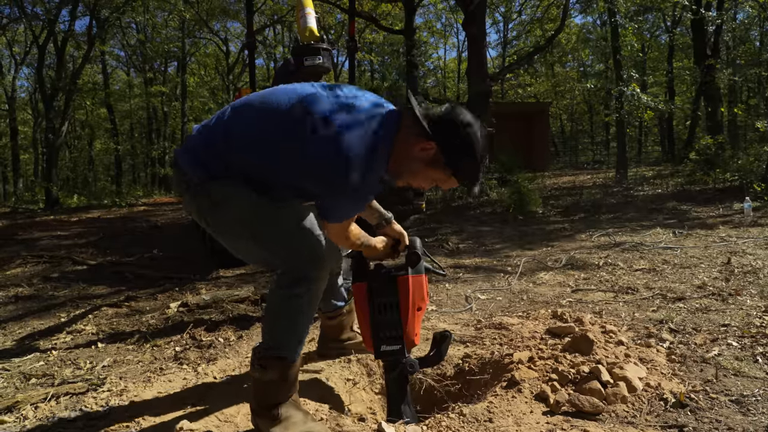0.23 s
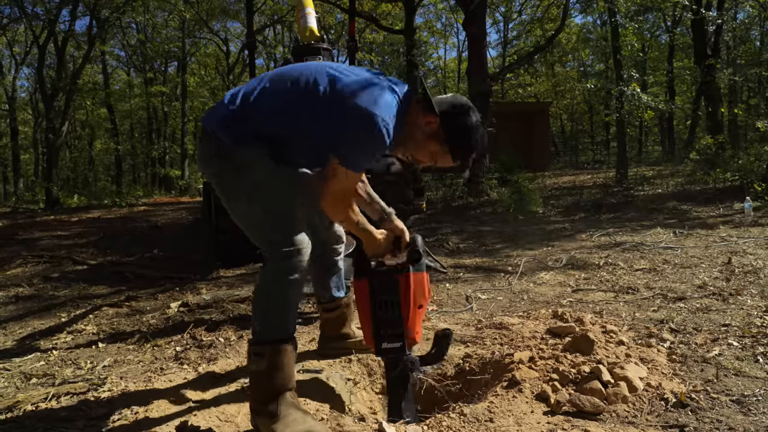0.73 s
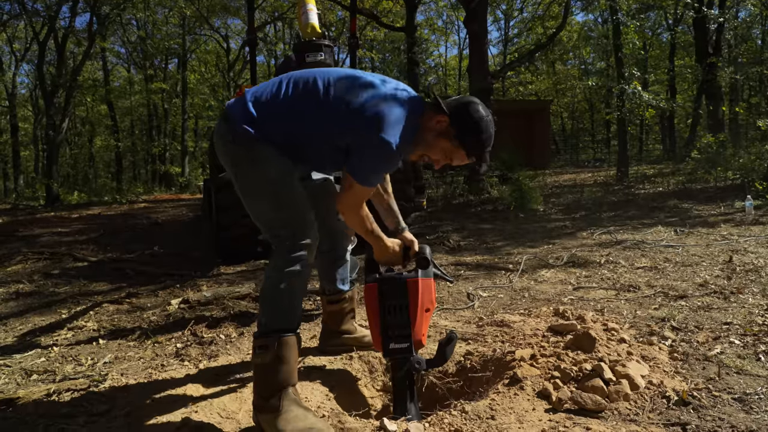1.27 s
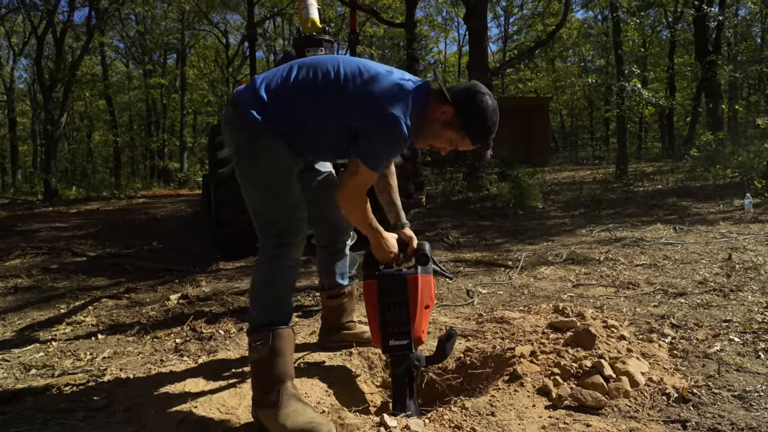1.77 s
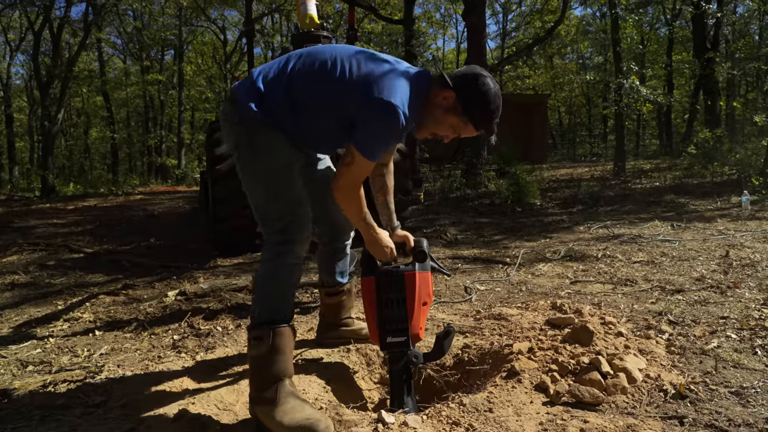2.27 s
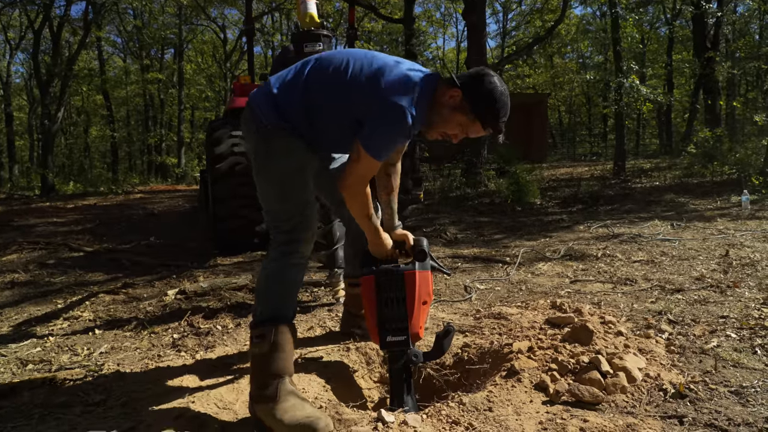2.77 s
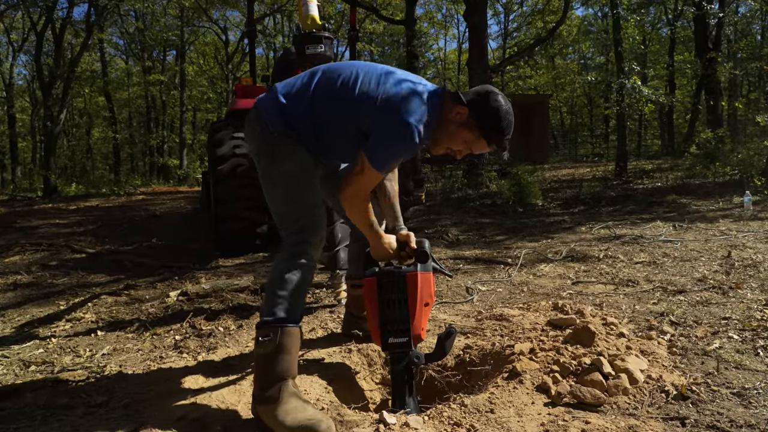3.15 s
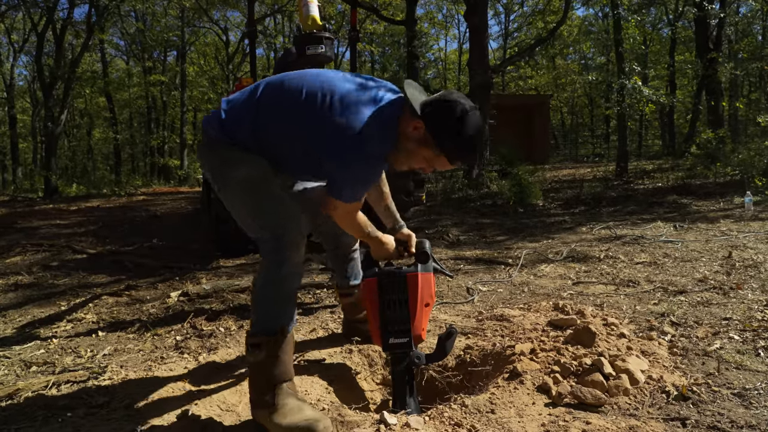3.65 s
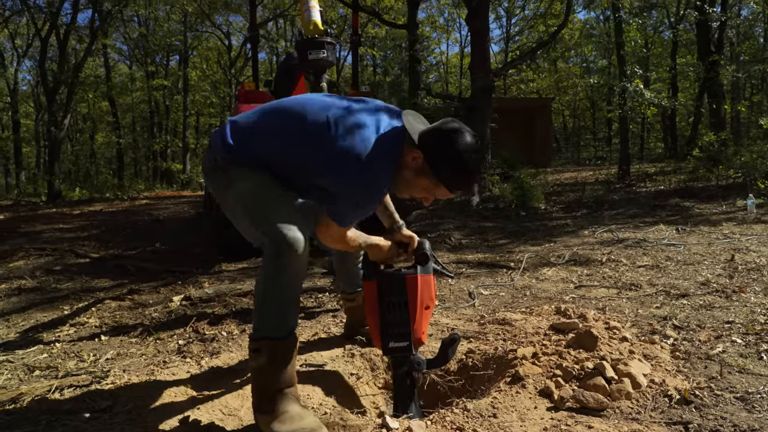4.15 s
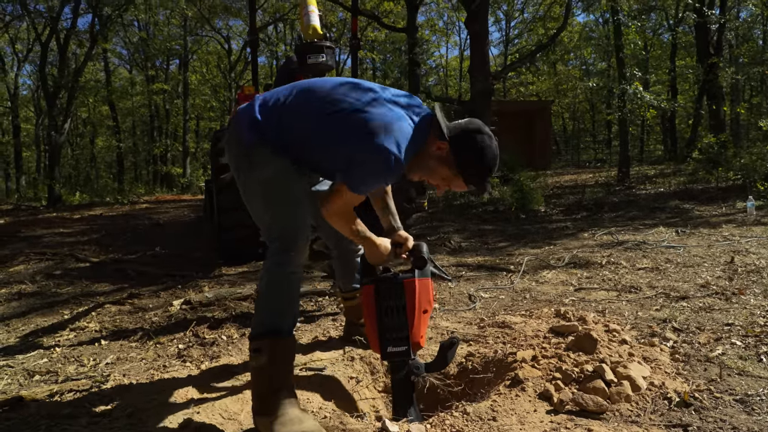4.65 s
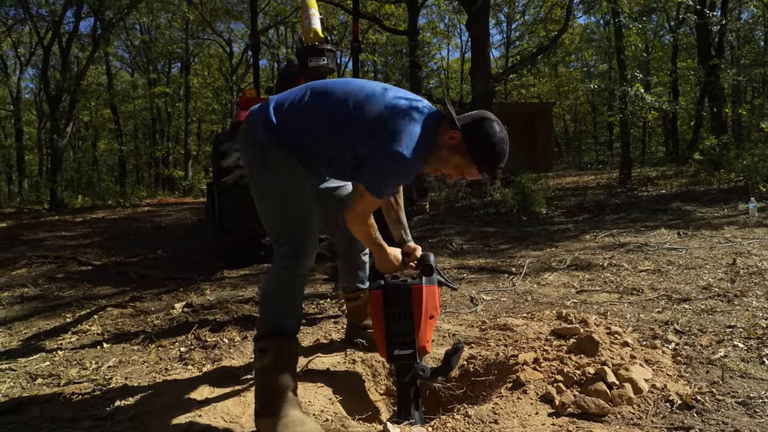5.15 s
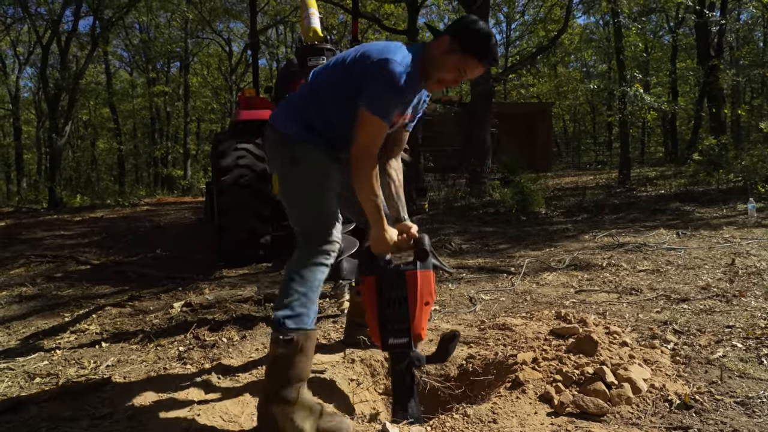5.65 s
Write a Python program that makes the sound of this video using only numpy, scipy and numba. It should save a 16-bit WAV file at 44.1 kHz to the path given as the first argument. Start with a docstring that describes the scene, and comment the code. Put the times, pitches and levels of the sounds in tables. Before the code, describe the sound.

Outdoors, close to a demolition hammer working rock in a hole, with a tractor's low diesel idle behind. From 0 to 0.4 s the pressed tip grinds roughly, with pulsing grit, slips and small rattles. Between 0.43 and 1.05 s hard, bright steel clanks come fast and uneven, with brief squeals and high chisel chatter. From 1.2 to 2.5 s blows are more spaced, roughly seven to ten a second, ringing thinly above lighter grinding. From 2.5 to 3.65 s they grow sparser and softer. A short hard burst at 3.76-3.97 s leads into heavy, gritty grinding with small squeals until 4.48 s. Strong clanks then return in clusters until about 5.3 s. After a gap, weaker knocks and one sharp, squealing hit fall at 5.64-5.77 s. At 5.83 s a dull low rumble starts abruptly and holds to the end. Very dry, faint woodland scatter; the hardest blows clip.

```python
"""Outdoors, in a post hole, a demolition hammer is worked into rock while a tractor idles behind it.
Its crank runs throughout; uneven blows are bursts of filtered noise and damped tones, and sine modes ring the chisel.
Leaned on, the tip grinds as noise through stone and contact resonances, slips, rattles and squeals.
Firing pulses and noise make the tractor; a low rumble sets in near the end. The loudest blows overload the microphone."""
import sys
import numpy as np
from scipy import signal
from scipy.fft import rfft, irfft, next_fast_len
from scipy.io import wavfile
from scipy.ndimage import uniform_filter1d
from numba import njit

SR = 44100
rng = np.random.default_rng(int(sys.argv[2]) if len(sys.argv) > 2 else 0)


def to_wav(sig):
    """Store sig (one row per channel, or 1-D mono) as 16-bit WAV at the path in sys.argv[1].

    Samples outside -1..1 are clipped; the rate is SR.
    """
    pcm = np.clip(np.atleast_2d(sig), -1, 1) * 32767
    pcm = np.round(pcm).astype(np.int16)
    wavfile.write(sys.argv[1], SR, pcm.T)  # frames by channels


N = 260631  # length in samples


def undb(db):
    """Decibels to gain."""
    return 10 ** (np.asarray(db) / 20)


def curve(rows):
    """A control joined by straight lines, one value a sample."""
    return np.interp(np.arange(N) / SR, *np.transpose(rows))


def unit(x):
    """Scale each row to rms 1."""
    return x / np.sqrt(np.mean(x ** 2, axis=-1, keepdims=True) + 1e-18)


def colour(x, points):
    """Causal minimum-phase filter with the given (Hz, dB) response."""
    size = next_fast_len(x.shape[-1] + 4096) // 2 * 2
    hz, db = np.transpose(points)
    bins_hz = np.arange(size // 2 + 1) * SR / size
    gain = undb(np.interp(np.log(bins_hz + 1), np.log(hz), db))
    # folding the cepstrum onto positive time puts the energy as early as possible
    cepstrum = irfft(np.log(gain))
    cepstrum[1:size // 2] *= 2
    cepstrum[size // 2 + 1:] = 0
    return irfft(rfft(x, size) * np.exp(rfft(cepstrum)))[..., :x.shape[-1]]


def band(shape, low_hz, high_hz):
    """Noise between two frequencies, rms 1."""
    edges = np.clip([low_hz, max(high_hz, low_hz + 20)], 1, SR / 2 - 1)
    sos = signal.butter(2, edges, "band", fs=SR, output="sos")
    return unit(signal.sosfilt(sos, rng.standard_normal(shape)))


def walk(rate):
    """Slow chance with a spread near 1, redrawn at the given rate in Hz and smoothed twice."""
    k = int(SR / rate)
    steps = np.repeat(rng.standard_normal(N // k + 1), k)
    return unit(uniform_filter1d(uniform_filter1d(steps, k), k)[:N])


def place(times, sounds):
    """Lay each sound on the time line."""
    out = np.zeros(N)
    for s, sound in zip(times, sounds):
        i = int(np.clip(s * SR, 0, N - 1))
        out[i:i + len(sound)] += sound[:N - i]
    return out


def strike(sounds, db):
    """Scale each sound so that its first 5 ms have the given rms level."""
    head = sounds[:, :SR // 200]
    return sounds * (undb(db) / np.sqrt(np.mean(head ** 2, axis=1)))[:, None]


@njit
def resonate(x, hz, width):
    """Band-pass with a moving centre and a fixed width, both in Hz."""
    y, b, l = np.empty(len(x)), 0., 0.
    for i in range(len(x)):
        g, k = np.tan(np.pi * hz[i] / SR), width / hz[i]
        v = (b + g * (x[i] - l)) / (1 + g * (g + k))
        b, l, y[i] = 2 * v - b, l + 2 * g * v, k * v
    return y


# Blows that land, with a few strong rebounds of the chisel among them. Each row: start in seconds, clank level
# in dB, # clank pitch in Hz, housing knock level in dB, ground thud level in dB, chatter level in dB, chatter
# length in seconds. # Levels are before the layer trims.
BLOW_ROWS = [(0.426, -15.5, 3240, -27, -26, -31, 0.027), (0.47, -9.5, 3140, -18, -30, -32, 0.027),
             (0.5084, -7.5, 3350, -29, -32, -29, 0.027), (0.5518, -7, 3380, -25, -24, -19.5, 0.046),
             (0.6066, -10.5, 2900, -18, -19.5, -19, 0.05), (0.6669, -5.5, 3320, -16.5, -26, -41, 0.014),
             (0.8797, -8, 3450, -16.5, -23, -17, 0.055), (0.9522, -10, 3310, -18, -26, -18, 0.03),
             (0.9763, -17, 3400, -21, -20.5, -16.5, 0.023), (1.047, -8, 3750, -18.5, -27.5, -38, 0.02),
             (1.168, -22, 3090, -42, -30, -42, 0.018), (1.2711, -9.5, 3080, -19, -22, -24, 0.031),
             (1.2958, -13, 3350, -15, -23.5, -32, 0.04), (1.407, -9.5, 3160, -15.5, -28.5, -28.5, 0.056),
             (1.5526, -9, 3050, -20, -25, -30, 0.04), (1.7033, -11, 2920, -21, -26.5, -30.5, 0.068),
             (1.8484, -12.5, 3380, -26, -26.5, -25.5, 0.06), (1.9783, -11, 3470, -22, -25, -18, 0.044),
             (2.0775, -10.5, 3300, -23.5, -21.5, -15, 0.027), (2.16, -10, 3240, -18.5, -20.5, -19.5, 0.048),
             (2.255, -11, 3490, -23, -21, -24, 0.071), (2.3733, -11, 3360, -23, -26.5, -20, 0.03),
             (2.4077, -16, 4400, -28.5, -43, -35, 0.044), (2.5273, -13.5, 3330, -32, -25.5, -37, 0.064),
             (2.7229, -15, 4290, -34, -29, -51, 0.02), (2.884, -14.5, 4520, -20.5, -23.5, -33, 0.047),
             (3.0472, -14.5, 4590, -26, -25.5, -36, 0.05), (3.2392, -16.5, 3250, -27.5, -28, -59, 0.02),
             (3.4625, -21, 3580, -34, -29.5, -46, 0.02), (3.6543, -22, 2980, -30, -26, -35, 0.039),
             (3.758, -11, 3450, -20.5, -19.5, -28, 0.036), (3.8384, -11.5, 2890, -19, -23.5, -19.5, 0.04),
             (3.905, -11, 2860, -13.5, -22, -19, 0.024), (3.967, -6, 3820, -15.5, -20, -32, 0.06),
             (4.482, -10.5, 3700, -16.5, -31, -25, 0.04), (4.523, -8.5, 3450, -17.5, -22, -17.5, 0.042),
             (4.573, -11.5, 3670, -18, -26, -28, 0.064), (4.617, -11.5, 3290, -17, -30, -21, 0.019),
             (4.6675, -10, 3170, -22, -37, -26, 0.024), (4.818, -12, 3240, -21, -21, -21, 0.022),
             (4.8647, -8.5, 3740, -15.5, -22.5, -12.5, 0.021),
             (4.9188, -5.5, 3500, -18.5, -25.5, -48, 0.018), (5.1326, -13, 3400, -18.5, -22, -25, 0.034),
             (5.1937, -8, 3580, -16, -22.5, -25, 0.041), (5.2776, -8, 3200, -20.5, -25, -45, 0.023),
             (5.6366, -22, 4050, -24, -28, -62, 0.02), (5.6624, -25, 3560, -19.5, -25.5, -57, 0.06),
             (5.7146, -10, 3030, -18.5, -35, -39, 0.024), (5.7733, -20, 3820, -17.5, -33, -57, 0.018)]
REBOUND_S, REBOUND_DB, REBOUND_HZ = 0.027, -12, 4380  # delay, level relative to the blow, clank pitch
REBOUND_DAMPING = 7.5  # dB lost per dB of grinding over the light level


def impacts():
    """The blows, and a weaker rebound after each with room for one: (s, clank dB, Hz, knock dB, thud dB)."""
    s, clank_db, hz, knock_db, thud_db = np.transpose(BLOW_ROWS)[:5]
    drop_db = REBOUND_DB - REBOUND_DAMPING * pressed(s)
    rebound_hz = np.full(len(s), REBOUND_HZ)
    rebounds = np.array([s + REBOUND_S, clank_db + drop_db, rebound_hz,
                         knock_db + drop_db - 7, thud_db + drop_db + 1.5])
    room = np.diff(s, append=s[-1]) > .07
    return np.hstack([[s, clank_db, hz, knock_db, thud_db], rebounds[:, room]])


# Spectrum of the steel clank. Each row: frequency in Hz, level in dB.
CLANK_SPECTRUM = [(1500, -27.5), (2400, -12.5), (3000, 1), (3400, 3.5), (3900, -4), (5800, -6), (6500, -11),
                  (7000, -2.5), (7800, -12.5), (8500, -7), (9300, -17.5), (11000, -17.5), (13500, -9.5),
                  (16000, -35)]
# Spectrum of the ground thud. Each row: frequency in Hz, level in dB.
THUD_SPECTRUM = [(60, -20), (150, -5.5), (240, 2.5), (400, -7), (900, -6), (2500, -43.5)]
TONE_EVEN_DB, TONE_SLOPE = -11.5, 0.29  # clanks softer than this are mostly tone, harder ones mostly crack


def blows():
    """Each blow is a short steel clank, a knock of the housing and a thud of the ground."""
    s, clank_db, hz, knock_db, thud_db = impacts()
    t = np.arange(SR // 10) / SR
    shape = (len(s), len(t))
    rise = 1 - np.exp(-t / 0.00045)
    tail = undb(-18.0) * np.exp(-t / 0.0053)
    crack = colour(rng.standard_normal(shape), CLANK_SPECTRUM) * rise * (np.exp(-t / 0.0025) + tail)
    # the rock damps the modes within a few cycles; the upper one shifts with the seating of the tip
    upper_hz = rng.uniform(4120, 6140, (len(s), 1))
    modes = np.sin(2 * np.pi * hz[:, None] * t) + undb(-7.5) * np.sin(2 * np.pi * upper_hz * t)
    tone = modes * rise * np.exp(-t / 0.0026)
    tone_db = TONE_SLOPE * (TONE_EVEN_DB - clank_db)
    mixed = strike(crack, clank_db) + strike(tone, clank_db + tone_db)
    clank = strike(mixed, clank_db - .4)
    knock = strike(band(shape, 1224, 2005) * rise * (np.exp(-t / 0.0062) + tail), knock_db + 0.2)
    ground = colour(rng.standard_normal(shape), THUD_SPECTRUM) * rise * np.exp(-t / 0.0081)
    thud = strike(ground, thud_db - .6)
    return place(s, clank + knock + thud)


CHATTER_GAP_S, CHATTER_FADE_DB_PER_S = 0.014, 1500  # mean spacing; fade once past the chatter length
CHATTER_DB = 3  # first-5-ms level over the chatter's mean
CHATTER_SOONER_S_PER_DB = 0.05  # a pressed chisel jumps less far and lands sooner, down to half the delay
SEAT_DB = -12  # ring of the chisel at the blow itself, relative to the clank
DEAD_DB = -37  # a blow with less chatter than this rings the chisel less, dB for dB


def contacts(count=5):
    """The chisel meets its holder at the blow, then in an uneven run until the chatter dies: (s, dB)."""
    s, clank_db, _, _, _, chatter_db, length = np.transpose(BLOW_ROWS)[..., None]
    timing, size = rng.standard_normal((len(s), 2, count)).transpose(1, 0, 2)
    first = np.maximum(REBOUND_S - CHATTER_SOONER_S_PER_DB * pressed(s), REBOUND_S / 2)
    age = first + CHATTER_GAP_S * (np.arange(count) + 0.33 * timing)
    fade_db = CHATTER_FADE_DB_PER_S * np.maximum(age - length, 0)
    run_db = chatter_db + CHATTER_DB + size - fade_db
    seat_db = clank_db + SEAT_DB + np.minimum(chatter_db - DEAD_DB, 0)
    return np.hstack([s, s + age]).ravel(), np.hstack([seat_db, run_db]).ravel()


# Modes of the chisel. Each row: frequency in Hz, relative level in dB, time to fall 60 dB in seconds.
CHISEL_MODES = [(7000, -13.5, 0.015), (7850, -34, 0.057), (8400, -17, 0.033), (11480, -7, 0.061),
                (12420, -4, 0.049), (13200, -19, 0.029), (12950, -2.5, 0.025), (13100, 5.5, 0.078)]


def rings():
    """The chisel rings in its high modes, in a new mix at every contact, and rasps as it chatters in its holder."""
    s, db = contacts()
    t = np.arange(SR // 12) / SR
    hz, mode_db, t60 = np.transpose(CHISEL_MODES)
    shape = (len(s), len(hz), 1)
    mix = undb(mode_db[:, None] + 4 * rng.standard_normal(shape))
    # each contact holds the steel a little differently and shifts its modes
    pitch = hz[:, None] * (1 + .004 * rng.standard_normal(shape))
    decay = np.exp(-np.log(1000) * t / t60[:, None])
    tones = np.sin(2 * np.pi * (pitch * t + rng.random(shape)))
    modes = np.sum(mix * decay * tones, axis=1)
    chatter = undb(4.5 * band((len(s), len(t)), 40, 200)) * np.exp(-t / .009)
    rasp = band(chatter.shape, 12730, 13430) * chatter
    rise = 1 - np.exp(-t / 0.00032)
    return place(s, strike((modes + undb(-4.0) * rasp) * rise, db))


FREE_HZ, FREE_T60_S = 12480, .36
FREE_DAMPING = 4.1  # dB lost per dB of grinding over the light level


def free_ring():
    """A thin mode sings on unless the tip is pressed; hard blows under pressure wake the lowest mode."""
    s, clank_db, _, _, _, chatter_db, _ = np.transpose(BLOW_ROWS)
    t = np.arange(SR // 2) / SR
    pitch = FREE_HZ + 6 * rng.standard_normal((len(s), 1))
    thin_db = .35 * clank_db + .3 * chatter_db - 18.5 - FREE_DAMPING * pressed(s)
    decay = np.exp(-np.log(1000) * t / FREE_T60_S)
    thin = undb(thin_db)[:, None] * np.sin(2 * np.pi * pitch * t) * decay
    # the lowest mode is a narrow noise band
    low_db = 1.25 * clank_db - 13 + 0.33 * pressed(s)
    low = undb(low_db)[:, None] * band(thin.shape, 6850, 7250) * np.exp(-t / 0.011)
    return place(s, thin + low)


# Grinding of the tip, louder the harder it is pressed. Each row: start in seconds, level in dB before the trim.
GRIND_LEVEL = [(0.0, -18.5), (0.44, -22), (0.58, -26), (0.94, -29), (1.83, -33), (2.01, -32), (2.17, -30),
               (2.53, -34.5), (2.98, -34), (3.47, -38.5), (3.71, -34.5), (3.84, -28), (4.0, -25),
               (4.31, -22), (4.49, -22), (4.64, -25), (5.46, -30.5), (5.82, -30.5)]
# Contact resonance, its centre drifting up and down over time. Each row: start in seconds, centre in Hz.
CONTACT_PITCH = [(0, 1700), (.4, 1630), (.62, 1400), (.8, 1660), (3.6, 1800), (3.9, 1345), (4.4, 1790),
                 (4.7, 1516), (5.9, 1690)]
# Response of the stone. Each row: frequency in Hz, level in dB.
STONE_RESPONSE = [(100, -14.5), (300, -8.5), (500, 0), (950, -5.5), (1400, -0.5), (2100, -2), (2550, -3.5),
                  (3600, -4), (5000, -9), (6500, -19), (8000, -18.5), (16000, -44.5)]


def grinding(turn, count=2):
    """Crushing grains, in two surges a crank turn and in sudden slips, coloured by stone and contact."""
    pulses = .45 + np.exp(-(count * turn % 1) / .3)
    surge = unit(pulses * undb(2.8 * walk(220)))
    force = np.hypot(undb(curve(GRIND_LEVEL) - 2.0) * surge, slips(turn))
    grains = unit(rng.standard_normal(N) * undb(2 * rng.exponential(size=N)))
    # both gains come from the steady grains, so the force alone sets the level
    stone_gain = 1 / np.std(colour(grains, STONE_RESPONSE))
    # the centre also wanders quickly around its drift
    contact_hz, width = curve(CONTACT_PITCH) * (1 + 0.11 * walk(40)), 200.
    contact_gain = undb(-10.0) / np.std(resonate(grains, contact_hz, width))
    stone = stone_gain * colour(grains * force, STONE_RESPONSE)
    contact = contact_gain * resonate(grains * force, contact_hz, width)
    return stone + contact


SLIP_DB, SLIP_SCATTER_DB = -16.5, -0.5  # level of full slips, and its random spread
SLIP_BITE_DB = -25  # full slips need at least this much grinding


def slips(turn):
    """Force envelope: leaned on, the tip slips and catches on the stone once a crank turn."""
    i = np.flatnonzero(np.diff(np.floor(turn)))
    t = np.arange(SR // 20) / SR
    shortfall_db = np.maximum(SLIP_BITE_DB - curve(GRIND_LEVEL)[i], 0)
    db = SLIP_DB - 1.8 * shortfall_db + SLIP_SCATTER_DB * walk(60)[i]
    jerk = (1 - np.exp(-t / 0.0012)) * np.exp(-t / 0.0055)
    return place(i / SR, undb(db)[:, None] * jerk)


def rattle(turn, count=3):
    """Small knocks of the tip, three to a crank turn, each ringing a few cycles near the contact resonance."""
    i = np.flatnonzero(np.diff(np.floor(count * turn)))
    pitch_chance, upper_chance, level_chance, time_chance = rng.standard_normal((len(i), 4)).T
    t = np.arange(SR // 40) / SR
    hz = curve(CONTACT_PITCH)[i] * 1.1 * np.exp(0.11 * pitch_chance)
    upper_hz = 2 * hz * np.exp(0.154 * upper_chance)
    ring = np.sin(2 * np.pi * hz[:, None] * t) * (1 - np.exp(-t / .0005)) * np.exp(-t / .0032)
    tick = undb(-2.5) * np.sin(2 * np.pi * upper_hz[:, None] * t) * np.exp(-t / 0.0013)
    db = curve(GRIND_LEVEL)[i] + 4.3 + 2.6 * level_chance
    return place(i / SR + 0.0033 * time_chance, undb(db)[:, None] * (ring + tick))


# Brief tones: squeals of the tip, a short 800 Hz thud and a high steel ring.
# Each row: start in seconds, length in seconds, mean pitch in Hz, level in dB.
BRIEF_TONES = [(0.497, 0.021, 1560, -16.5), (0.539, 0.016, 1490, -21), (0.587, 0.021, 1344, -21.5),
               (0.883, 0.05, 12800, -21), (4.12, 0.017, 1626, -18), (4.165, 0.013, 1700, -17),
               (4.665, 0.015, 1496, -24), (5.663, 0.0037, 800, -19), (5.71, 0.0081, 13000, -13.5),
               (5.715, 0.006, 1540, -8.5)]


def brief_tones():
    """Brief wavering tones: squeals of the tip, a short 800 Hz thud and a high steel ring."""
    sounds = []
    for s, length, hz, db in BRIEF_TONES:
        size = int(length * SR)
        pitch = hz + np.sqrt(hz) * 2.1 * band(size, 39, 320)
        swell = signal.windows.tukey(size, .5) * undb(1.0 * band(size, 40, 280))
        tone = np.sin(2 * np.pi * np.cumsum(pitch) / SR)
        sounds.append(undb(db) * unit(swell * tone))
    return place([row[0] for row in BRIEF_TONES], sounds)


LIGHT_DB, HEAVY_DB = -31, -23  # grinding level with the tip resting lightly, and leaned on


def pressed(s):
    """How far the grinding at the given times exceeds that of a lightly resting tip, in dB."""
    return np.maximum(np.interp(s, *np.transpose(GRIND_LEVEL)) - LIGHT_DB, 0)


CRANK_FREE_HZ, CRANK_LOADED_HZ, CRANK_START_TURNS = 32.29, 25.44, .57
CRANK_WANDER = .02  # relative unsteadiness of the motor


def crank():
    """Turns of the crank; the motor slows as the hammer is leaned on."""
    load = np.clip((curve(GRIND_LEVEL) - LIGHT_DB) / (HEAVY_DB - LIGHT_DB), 0, 1)
    hz = CRANK_FREE_HZ + (CRANK_LOADED_HZ - CRANK_FREE_HZ) * load
    return CRANK_START_TURNS + np.cumsum(hz * (1 + CRANK_WANDER * walk(6))) / SR


def housing(turn):
    """The hammer's body shakes at crank rate, more as the tip bites."""
    strokes = np.diff(np.floor(turn), prepend=0) * undb(3.2 * walk(40))
    body = [(60, -35.0), (135, -3.5), (220, -3.5), (320, -20.0), (700, -44.0), (6000, -83)]  # (Hz, dB)
    shake = unit(colour(strokes, body))
    return (shake - np.mean(shake)) * undb(-31.5 + 0.41 * curve(GRIND_LEVEL))


def motor_tick(turn):
    """A faint high tick of the motor once a crank turn, stronger under load."""
    pulse = np.exp(-(turn % 1) / 0.2) * (1 - np.exp(-(turn % 1) / .04))
    hiss = band(N, 7950, 9940) + undb(-7) * band(N, 4500, 13500)
    return undb(-44.0 + 0.19 * curve(GRIND_LEVEL)) * unit(pulse * hiss)


# Spectrum of the tractor's exhaust. Each row: frequency in Hz, relative level in dB.
EXHAUST_SPECTRUM = [(20, -25), (33, 1), (66, 0.5), (100, 6), (133, 4), (170, -13), (300, -4), (420, -37),
                    (900, -14), (6000, -90)]
# Spectrum of the tractor's clatter. Each row: frequency in Hz, relative level in dB.
CLATTER_SPECTRUM = [(30, -5), (140, -0.5), (230, -7), (380, -8), (800, -11), (1300, -11), (2200, -21),
                    (4500, -28), (7000, -32), (11000, -33), (16000, -42)]
IDLE_HZ = 33.21  # mean firing rate


def tractor():
    """Diesel firings thump in the exhaust; mechanical clatter swells slightly with each of them."""
    cycle = np.cumsum(IDLE_HZ + 0.1516 * walk(1.976)) / SR
    firings = np.diff(np.floor(cycle), prepend=0) * undb(1.0 * walk(30))
    hum = undb(-35.5) * unit(colour(firings, EXHAUST_SPECTRUM))
    beat = (9.7 + np.exp(-(cycle % 1) / 1.7)) * undb(0.6 * walk(24.95))
    clatter = undb(-36) * unit(beat * colour(band(N, 93, 17000), CLATTER_SPECTRUM))
    return hum - np.mean(hum) + clatter


# Spectrum of the closing rumble. Each row: frequency in Hz, relative level in dB.
RUMBLE_SPECTRUM = [(20, -11), (50, 1.5), (210, 0), (330, -9.5), (1000, -11.5), (2000, -24), (4000, -34),
                   (8000, -32), (15000, -53)]
RUMBLE_S = 5.834  # onset


def rumble():
    """A low rumble of filtered noise that sets in suddenly and holds to the end."""
    onset = np.clip((np.arange(N) / SR - RUMBLE_S) / 0.0019, 0, 1)
    return undb(-19.5) * unit(colour(rng.standard_normal(N), RUMBLE_SPECTRUM)) * onset


def woods(x):
    """Weak, dull scatter from the ground and the trees: convolution with a short noise tail."""
    t = np.arange(SR // 2) / SR
    response = band(len(t), 280, 6000) * np.exp(-t / 0.015) * (1 - np.exp(-t / 0.012))
    return undb(-23.5) * signal.fftconvolve(x, response / np.linalg.norm(response))[:N]


def scene():
    """The hammer close by, the tractor behind it."""
    turn = crank()
    steel = blows() + rings() + free_ring()
    tip = grinding(turn) + rattle(turn) + brief_tones()
    hammer = steel + tip + housing(turn) + motor_tick(turn)
    return (hammer + woods(hammer) + tractor() + rumble())[None]


TOP_HZ = 15900  # upper limit of the microphone signal


def record(dry):
    """The microphone clips the loudest blows; the top is cut."""
    clipped = np.clip(dry, -1, 1)
    return signal.sosfilt(signal.ellip(8, .2, 70, TOP_HZ, fs=SR, output="sos"), clipped)


dry = scene()
out = record(dry)
to_wav(out)
```